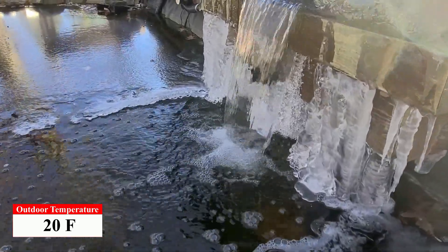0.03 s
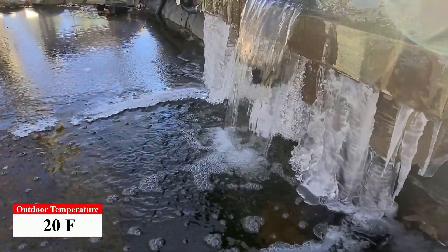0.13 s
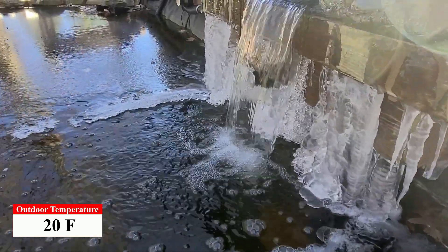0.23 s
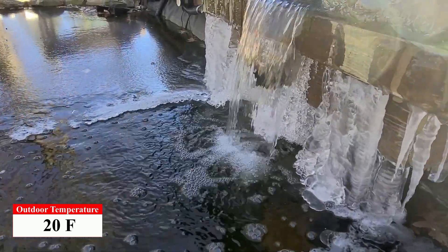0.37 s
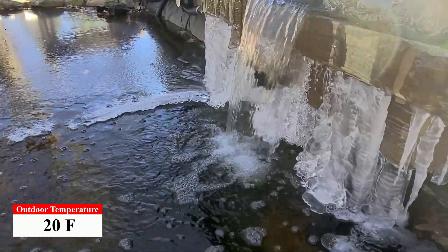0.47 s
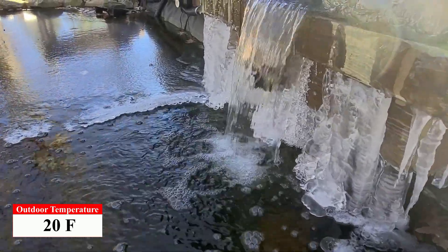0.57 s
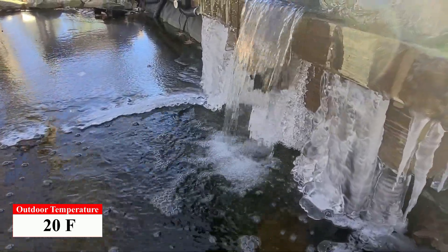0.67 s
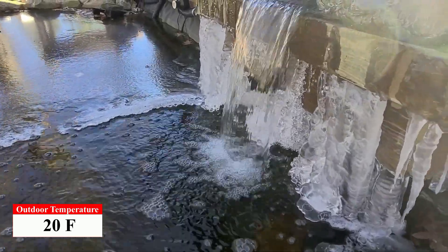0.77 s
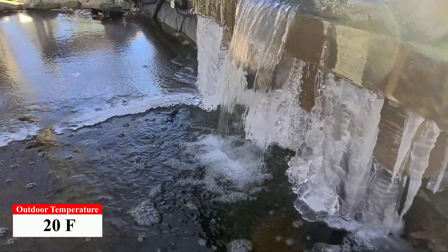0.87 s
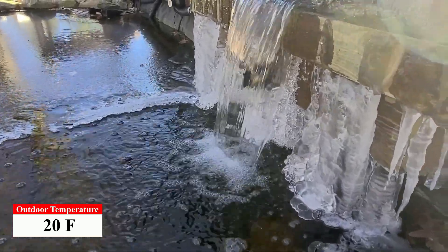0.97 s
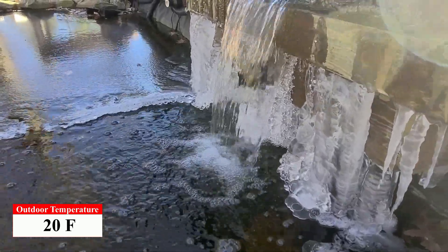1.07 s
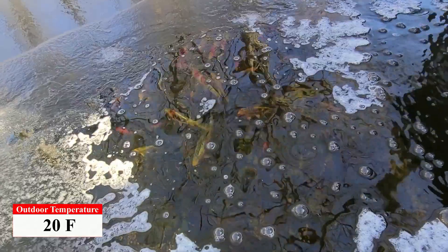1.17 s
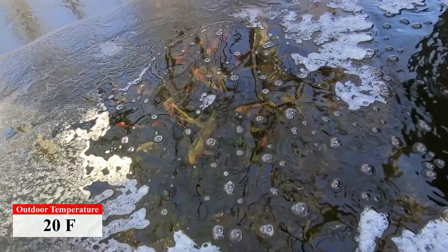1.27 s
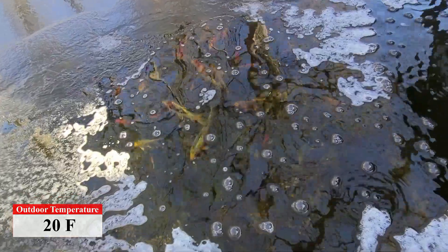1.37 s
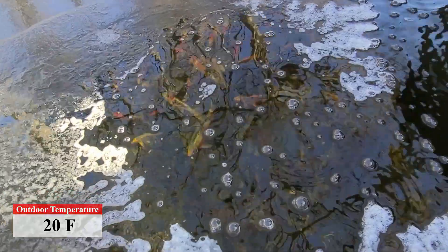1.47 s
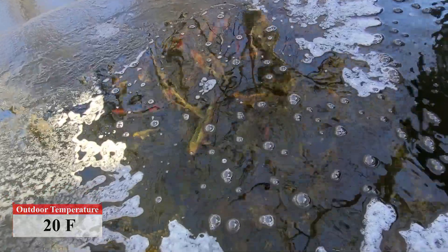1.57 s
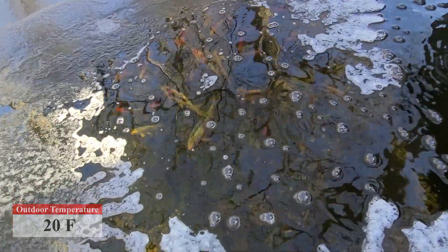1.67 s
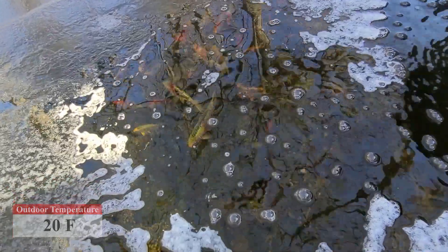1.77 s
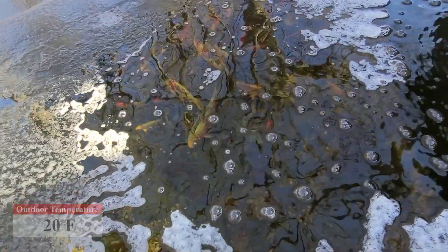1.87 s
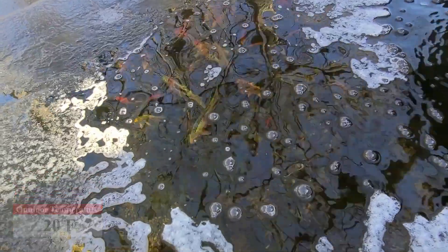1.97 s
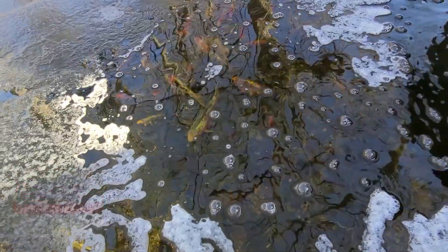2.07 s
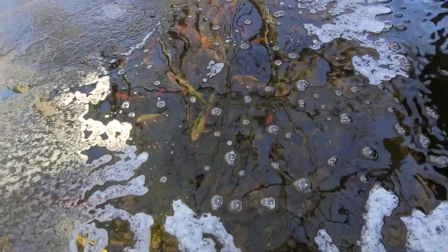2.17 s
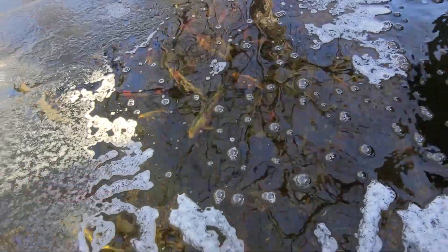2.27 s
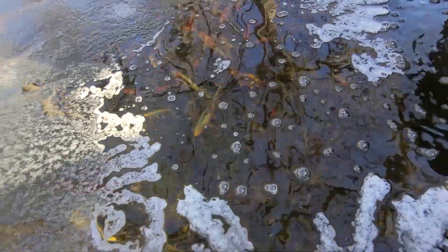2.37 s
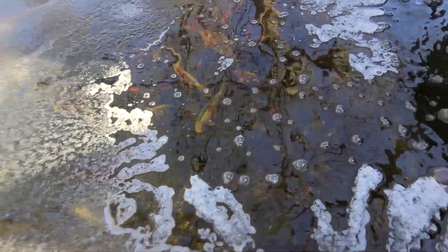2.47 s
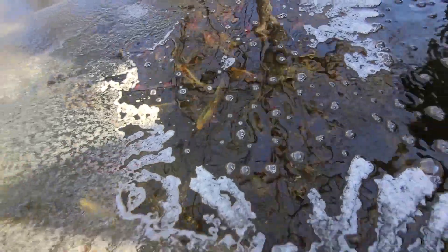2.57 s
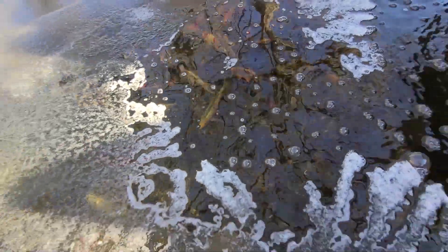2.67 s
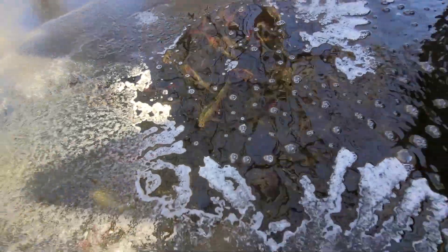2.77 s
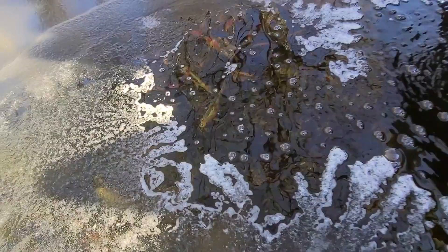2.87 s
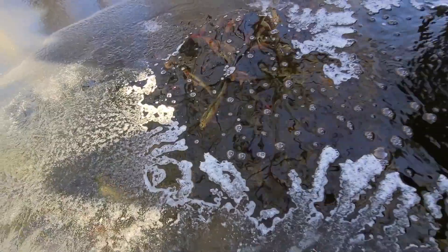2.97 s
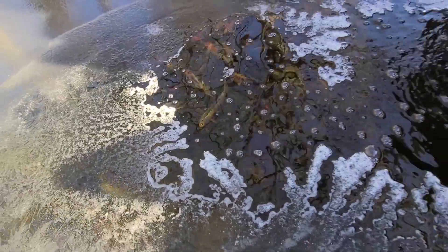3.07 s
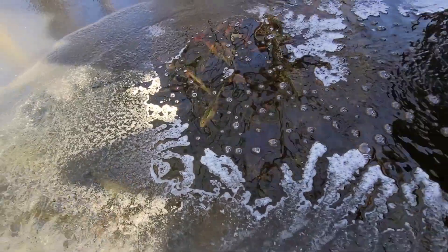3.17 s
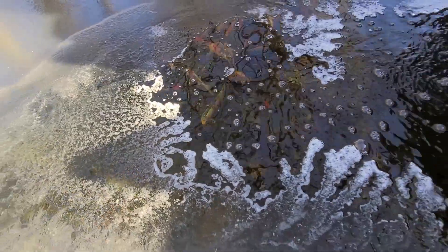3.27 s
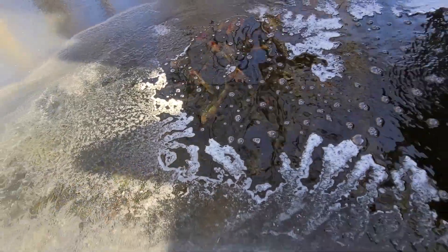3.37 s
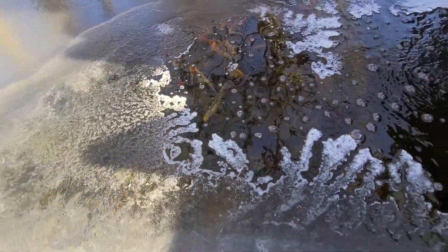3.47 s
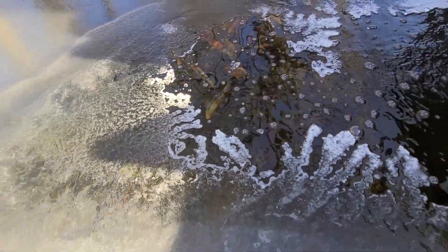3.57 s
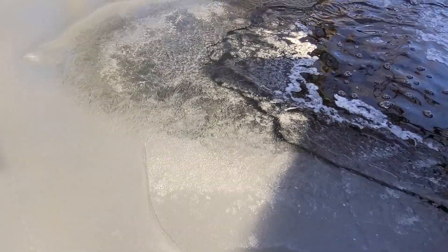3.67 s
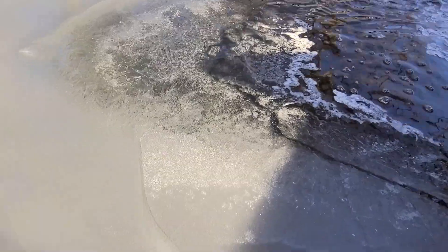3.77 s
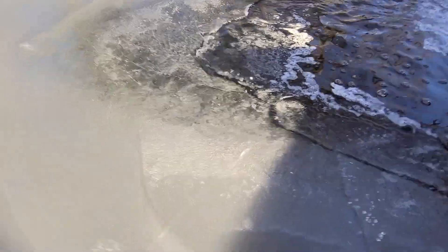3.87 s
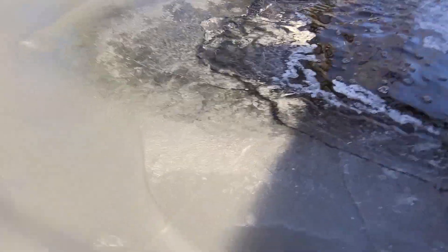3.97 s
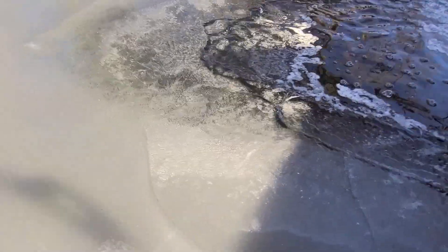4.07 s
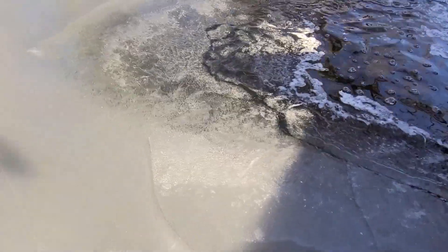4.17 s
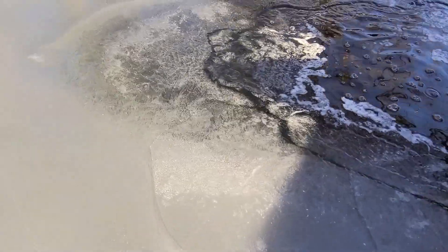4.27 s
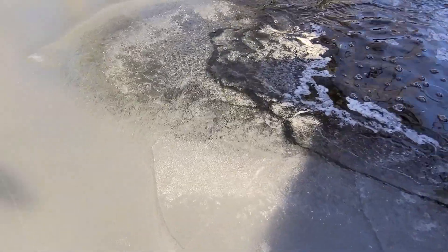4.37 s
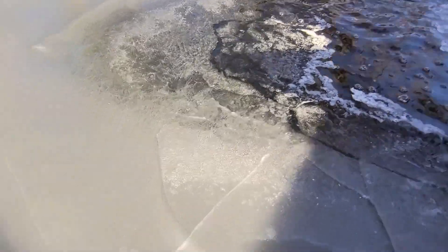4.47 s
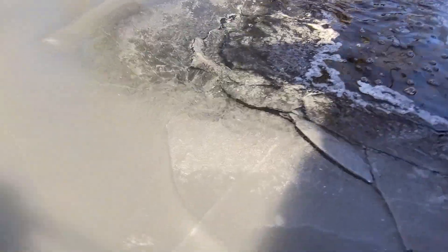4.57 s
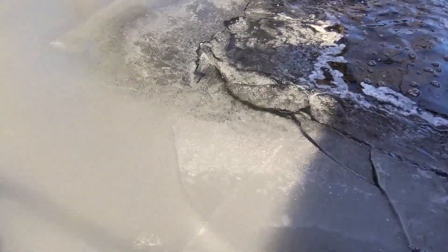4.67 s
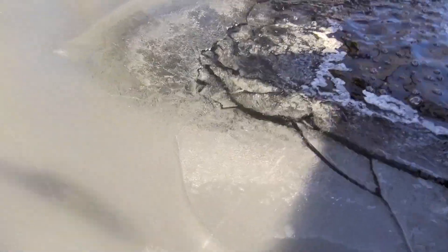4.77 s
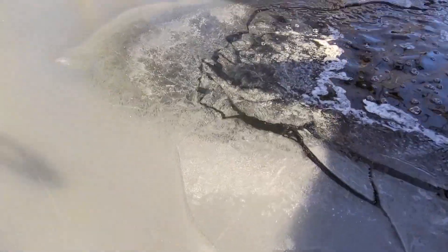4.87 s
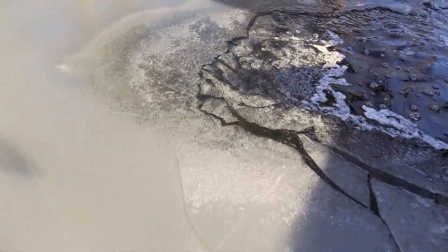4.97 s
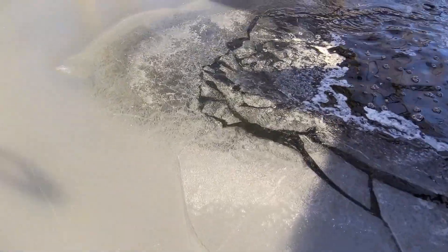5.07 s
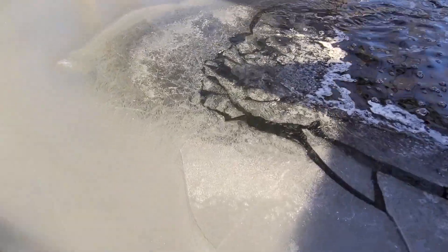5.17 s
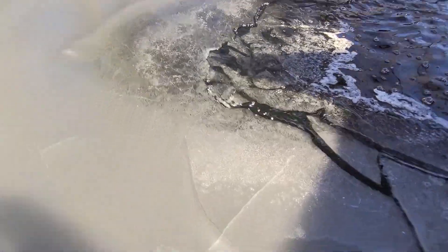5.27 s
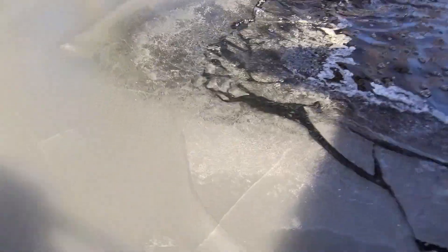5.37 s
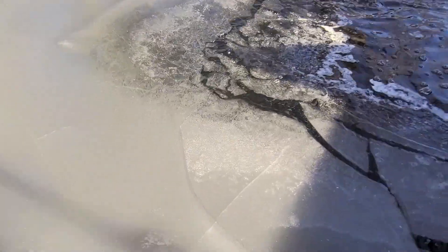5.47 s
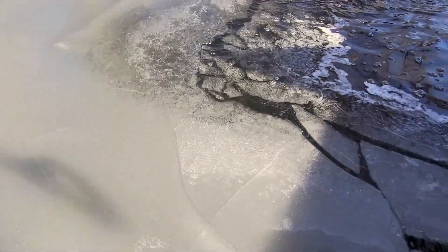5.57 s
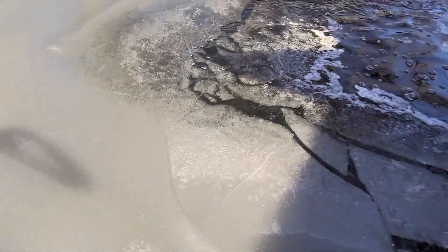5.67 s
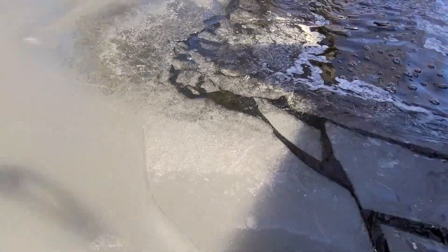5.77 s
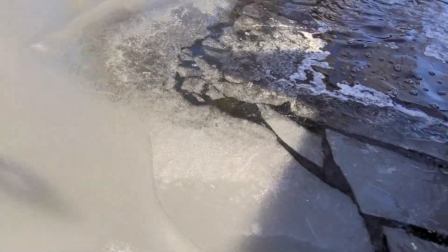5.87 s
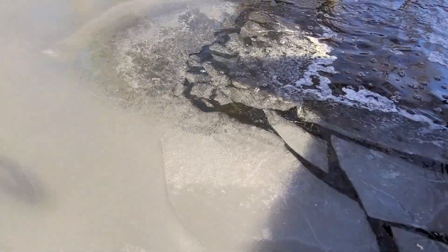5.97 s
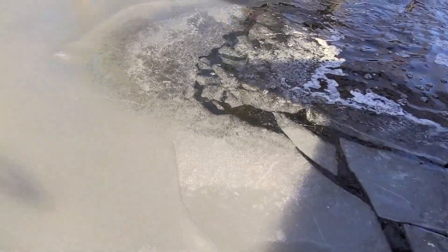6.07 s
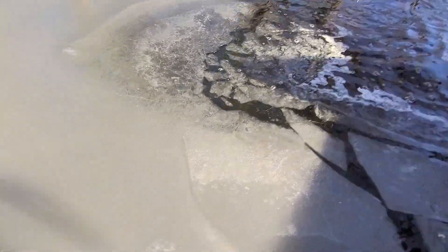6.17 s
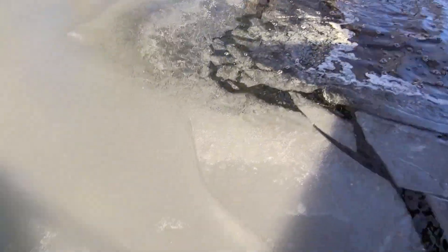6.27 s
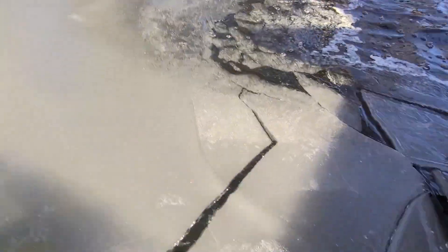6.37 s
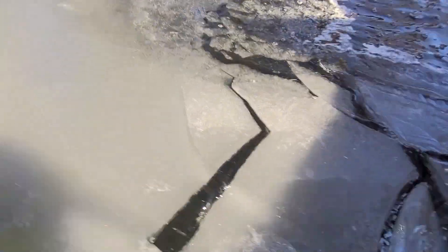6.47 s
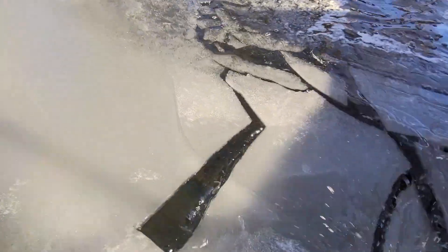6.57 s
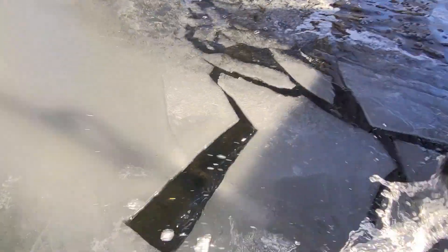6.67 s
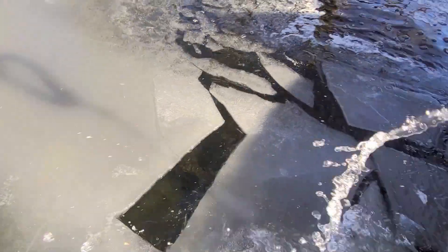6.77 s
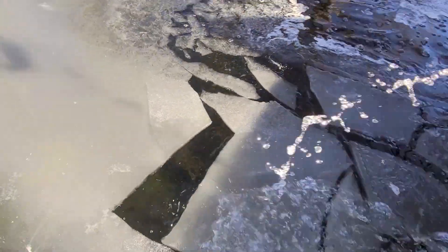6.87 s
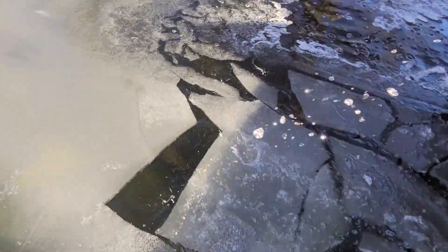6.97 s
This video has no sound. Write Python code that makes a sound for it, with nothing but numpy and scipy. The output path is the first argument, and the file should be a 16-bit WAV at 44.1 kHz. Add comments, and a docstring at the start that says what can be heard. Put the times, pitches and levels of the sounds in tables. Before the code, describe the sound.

Outdoors at a partly frozen garden pond, a small waterfall splashes and bubbles steadily over a low rumble, with near drops plinking. The closer stereo microphone shifts place twice, the water becoming duller and quieter. Then four spaced blows hit the ice sheet: thud, sharp crack, crunch, hollow ringing and deep boom, each with a little spurt of water. The last is the heaviest, with floes knocking, water surging and drops pattering.

```python
"""At a half-frozen garden pond a stereo pair hears a small waterfall, noise and ringing bubbles, over a low rumble.
Near drops plink; the listening place moves at 1.2 s and at 3.6 s, just after a second large bubble gulps up.
From 3.8 s four blows break the ice sheet: noise bursts crack and crunch, modes ring, the sheet heaves and booms.
Spurts of spray and bubbles follow each blow; after the last, water surges, air gulps up and drops patter.
Loud blows push the recorder's gain down, and it creeps back afterwards."""
import sys
import numpy as np
from scipy import signal
from scipy.fft import rfft, irfft, next_fast_len
from scipy.io import wavfile
from scipy.ndimage import uniform_filter1d, map_coordinates

SR = 44100
rng = np.random.default_rng(int(sys.argv[2]) if len(sys.argv) > 2 else 0)


def master_out(mix):
    """Clip the mix to full scale and print it as 16-bit PCM to the path in sys.argv[1]."""
    frames = np.transpose(np.atleast_2d(mix))
    ceiling = np.clip(frames, -1, 1)
    pcm = np.round(ceiling * 32767).astype(np.int16)
    wavfile.write(sys.argv[1], SR, pcm)


N = 309135

# Level of the waterfall, before fixed trims: (time [s], bubbling level [dB], spray level [dB])
WATERFALL_LEVEL = [(0, -36.5, -43.5), (1.2, -35.5, -43), (2.7, -36, -43.5), (3.62, -35.5, -46),
                   (3.66, -44, -52.5), (5.0, -42, -51), (5.65, -42, -50), (5.92, -37.5, -47.5),
                   (7.0, -35, -42.5)]
# Listening places, levels before fixed trims: (start [s], lead of the right microphone [ms],
# spatter level [dB], its unevenness [dB], treble left over right [dB], rumble over bubbling [dB])
LISTENING_PLACES = [(0, 0.0076, -3, 5, 2.5, 1), (1.173, 0.46, -4.5, 5.5, -7, -3),
                    (3.643, 0.4, -7, 5.5, -4, -1)]
# Colour of the water, one relative spectrum for each place: (frequency [Hz], density [dB per Hz])
WATER_SPECTRA = [
    [(100, -30), (200, -14), (400, -4.5), (750, 2), (1050, -0.5), (1300, 2.5), (1900, -3.5), (2500, -7.5),
     (3300, -10), (5000, -15), (8800, -14.5), (12000, -18), (16000, -22)],
    [(100, -30), (200, -8.5), (400, -5.5), (750, 1.5), (1050, -0.5), (1300, 0.5), (1900, -5), (2500, -10.5),
     (3300, -11.5), (4400, -16), (6500, -19), (8800, -16.5), (12000, -22), (16000, -26.5)],
    [(100, -30), (200, -14), (400, -5.5), (800, 2.5), (1350, 2.5), (2100, -8.5), (3300, -12), (6000, -19.5),
     (8800, -17), (12000, -21.5), (16000, -24.5)],
]
# Relative spectrum of the rumble: (frequency [Hz], density [dB per Hz])
RUMBLE_SPECTRUM = [(12, -46.5), (20, -20), (46, -1.5), (65, 1.5), (82, 0), (134, -12.5), (172, -14.5),
                   (242, -22.5), (300, -21), (390, -23), (660, -120)]
# Decay of the garden's reflections: (frequency [Hz], t60 [s])
GARDEN_DECAY = [(200, 0.17), (2000, 0.15), (12000, 0.19)]
# Nearest drops plinking into the pond, before a fixed trim: (time [s], peak level [dB], pitch [Hz])
NEAR_DROPS = [(.551, -24.5, 3200), (.675, -28, 2700), (.691, -25, 3560), (.931, -25.5, 3270),
              (.957, -24, 2600), (1.097, -22, 2630), (1.389, -27.5, 2510), (2.423, -28, 2080)]
# Showers of smaller drops, before the same trim:
# (start [s], end [s], rate [drops per s], mean peak level [dB], middle pitch [Hz])
DROP_SHOWERS = [(0, 1.12, 26, -30.5, 2890), (0.301, 1.12, 9, -29, 1400), (1.199, 3.502, 14, -34, 2507),
                (6.85, 6.98, 70, -28.5, 1710)]
# Sharpest chips and droplets landing on the ice, before a fixed trim: (time [s], peak level [dB], pitch [Hz])
ICE_TICKS = [(.767, -25.5, 9000), (2.67, -30, 8400), (2.847, -30, 5200), (3.115, -33, 10300),
             (5.4012, -25.5, 8200), (6.4945, -17, 9800), (6.55, -13.5, 7700), (6.948, -22, 8800)]
# Large air bubbles: (time [s], level [dB], start pitch [Hz], end pitch [Hz], length [s])
AIR_GULPS = [(2.502, -33.5, 558, 656, 0.06), (3.602, -35.5, 410, 630, 0.028), (5.326, -26, 340, 408, 0.037),
             (6.487, -12, 478, 637, 0.017), (6.493, -15, 736, 1270, 0.015), (6.511, -19.5, 283, 1037, .056),
             (6.829, -24, 1280, 2040, 0.0095), (6.845, -20, 754, 1475, .0136),
             (6.872, -25, 1480, 1780, 0.0114), (6.927, -24, 1960, 2130, 0.014)]
# Blows on the ice: (time [s], first touch level [dB], crack level [dB], crunch level [dB],
# plunge level [dB], rebound level [dB], spurt level [dB], spurt length [s])
ICE_BLOWS = [(3.819, -13, -9.5, -18.5, -8, -18, -33, 0.022),
             (4.4787, -18, -8, -17.5, -10, -25.5, -32.5, 0.032),
             (5.213, -24, -10, -18.5, -9, -20, -22, 0.054),
             (6.3247, -12, -12, -16, -2.5, -13, -20.5, 0.023)]
# The sheet splits further and its floes knock together: (time [s], crack level [dB], ring level [dB])
FLOE_KNOCKS = [(6.338, -20, -17), (6.356, -15, -9.5), (6.433, -12.5, -16.5), (6.494, -12, -20)]
# Modes of the floating sheet, before random scatter: (frequency [Hz], level [dB], t60 [s])
ICE_MODES = [(163, -17, 0.17), (270.4, -7.5, 0.2), (351.2, -6, 0.18), (381.3, -4.5, 0.36), (440, -13, 0.23),
             (587, -8, 0.1), (732, -1.5, 0.064), (857, 1.5, 0.053), (957, -22, 0.11), (1270, -1, 0.02),
             (1870, 3.5, 0.038)]
# Relative spectrum of cracking ice: (frequency [Hz], density [dB per Hz])
CRACK_SPECTRUM = [(100, -17), (400, 3), (850, 2), (1300, -6), (2500, -7), (4000, -3), (6000, -9.5),
                  (11000, -15), (16000, -30)]
# Relative spectrum of crunching ice: (frequency [Hz], density [dB per Hz])
CRUNCH_SPECTRUM = [(40, 5), (130, 10.5), (300, 0.5), (850, 2), (1200, -7.5), (2000, -9), (2700, -17),
                   (4000, -15), (6000, -20.5), (10000, -23.5), (16000, -29)]
# How long the broken edges crumble: (frequency [Hz], t60 [s])
CRUMBLE_DECAY = [(150, 0.41), (400, 0.35), (900, 0.18), (2000, 0.24), (7000, 0.48), (15000, 0.3)]
# Water surging through the broken sheet: (time [s], length [s], spurt level [dB], slosh level [dB])
LATE_SPLASHES = [(6.428, 0.062, -21, -18.5), (6.487, 0.04, -19.5, -18), (6.65, 0.069, -44, -36),
                 (6.824, 0.15, -28, -59)]
# Relative spectrum of spurting water: (frequency [Hz], density [dB per Hz])
SPURT_SPECTRUM = [(150, -20), (500, -21), (1000, -1), (2000, 3), (4000, -4), (6000, -4.5), (10000, -3.5),
                  (16000, -11.5)]
# Relative spectrum of sloshing water: (frequency [Hz], density [dB per Hz])
SLOSH_SPECTRUM = [(60, -23), (180, -7), (300, 4), (600, -2.5), (950, -2), (1500, -9), (4000, -50)]

MONO_HZ = 326  # below about here, scattered sound grows alike at both microphones
DROP_SPREAD_DB, DROP_SPREAD_OCT = 2, 0.42  # how much scattered drops differ in size and pitch
FLIGHT_MIN_S, FLIGHT_MAX_S = 0.041, 0.42  # time aloft of droplets thrown by a splash
DROPLET_DB, DROPLET_HZ = -13.5, 8500  # their mean level over the spurt, before a trim, and middle pitch
TOUCH_S = 0.0087  # the first touch begins this long before the crack
SPURT_S, PLUNGE_S, REBOUND_S, SLOSH_S = 0.027, 0.0347, 0.043, 0.055  # delays after the crack
RING_DB = -5  # ring of a dry blow, over its crack
WET_CRUNCH_DB = -11.5  # crunch of a wet contact, over its crack
WET_RING_DB, WET_RING_HZ = 2, 523  # a water-cushioned contact: rebound ring over crack, upper edge of its modes
MODE_SCATTER_DB = 1.5  # spread of each mode's strength from blow to blow
PUSH_WIDTH_S, BOOM_DB = 0.0041, -6  # width of the plunging push; boom over the plunge
SLOSH_DB, SLOSH_LENGTH_S = -22, 0.06  # slosh over the plunge; length of the water washing back
POCKET_HZ, POCKET_T60_S, POCKET_DB = 356, 0.11, 3  # air under the sheet: pitch, ring time, level over rebound
# gain control: threshold, share of the excess taken off, smoothing time, speed of recovery
AGC_DB, AGC_SHARE, AGC_ATTACK_S, AGC_DB_PER_S = -22.5, 0.44, 0.022, 7.5
TOP_HZ = 16100  # band limit of the recorder


def amp(db):
    """Decibels to gain."""
    return 10 ** (np.asarray(db) / 20)


def unit(x):
    """Scale to rms 1."""
    return x / np.sqrt(np.mean(x ** 2) + 1e-20)


def along(points, hz):
    """Read (frequency [Hz], value) points on a log frequency axis."""
    f, v = np.transpose(points)
    return np.interp(np.log(hz + 1), np.log(f + 1), v)


def curves(rows):
    """One value per sample for each column after the time."""
    s, *cols = np.transpose(rows)
    return [np.interp(np.arange(N) / SR, s, c) for c in cols]


def wobble(rate):
    """A smooth random curve, rate knots a second."""
    knots = rng.standard_normal(int(N * rate / SR) + 4)
    return map_coordinates(knots, [np.arange(N) * rate / SR])


def filtered(x, response):
    """x times a response of frequency."""
    n = x.shape[-1]
    size = next_fast_len(n + SR // 8)
    return irfft(rfft(x, size) * response(np.fft.rfftfreq(size, 1 / SR)), size)[..., :n]


def coloured(x, spectrum):
    """x shaped by the given spectrum, at rms 1."""
    return unit(filtered(x, lambda hz: amp(along(spectrum, hz))))


def dying(x, decay):
    """Each frequency of x dies away at its own speed."""
    hz, t, z = signal.stft(x, SR, nperseg=256)
    fade = amp(-60 * t / along(decay, hz)[:, None])
    return signal.istft(z * fade, SR, nperseg=256)[1][..., :x.shape[-1]]


def patchy(x, depth_db):
    """Small splats: brief random gains, each over a part of the spectrum."""
    z = signal.stft(x, nperseg=256)[2]
    field = uniform_filter1d(rng.standard_normal(z.shape), size=22, axis=0)
    field = uniform_filter1d(field, size=3, axis=1)
    return signal.istft(z * amp(depth_db * unit(field)), nperseg=256)[1][:len(x)]


def from_right(x, lead_ms):
    """A mono sound reaches the right microphone first."""
    side = np.array([[-1], [1]])
    return filtered(x, lambda hz: np.exp(np.pi * 1j * hz * lead_ms / 1000 * side))


def diffuse(x):
    """Scattered sound differs less between the microphones as the waves grow longer."""
    mid, side = (x[0] + x[1]) / 2, (x[0] - x[1]) / 2
    side = filtered(side, lambda hz: hz ** 2 / (hz ** 2 + MONO_HZ ** 2))
    return np.array([mid + side, mid - side])


def add(track, s, sound):
    """Mix a sound into the track at time s."""
    part = track[..., max(0, round(s * SR)):][..., :sound.shape[-1]]
    part += sound[..., :part.shape[-1]]


def bubbles(n, count, low_hz, high_hz, cycles, spread_db, rise):
    """n samples of decaying bubble rings, pitched evenly in octaves; each rises as it nears the surface."""
    when, pitch, size = rng.random((count, 3)).T[..., None]
    hz = low_hz * (high_hz / low_hz) ** pitch
    t = np.arange(SR // 60) / SR
    age = t * hz / cycles
    strength = hz * amp(-spread_db * np.log(np.maximum(size, 0.02)))
    tone = np.sin(2 * np.pi * hz * t * (1 + rise * np.minimum(age, 4)))
    ring = strength * np.exp(-age) * (1 - t / t[-1]) * tone
    position = (when * n).astype(int) + np.arange(len(t))
    return unit(np.bincount(position.ravel(), ring.ravel(), n)[:n])


def spatter(shape, rate, spread_db):
    """Random tiny impacts of very unequal size, rms 1."""
    size = amp(spread_db * np.minimum(rng.exponential(size=shape), 5))
    return unit((rng.random(shape) < rate / SR) * size * rng.standard_normal(shape))


def garden(x):
    """Stones and ice scatter a sound into a short tail of noise, unlike at the two microphones."""
    tail = dying(rng.standard_normal((2, SR // 4)), GARDEN_DECAY)
    return signal.fftconvolve(x, tail / np.linalg.norm(tail[0]), axes=1)[:, :x.shape[1]]


def waterfall():
    """The falling sheet traps bubbles and throws spray, amid a diffuse wash and the garden's reflections."""
    out = np.zeros((2, N))
    bubbling_db, spray_db = curves(WATERFALL_LEVEL)
    swarm = bubbles(N, count=9000, low_hz=393.4, high_hz=4543, cycles=5.7, spread_db=2.5, rise=0.034)
    for place, spectrum in zip(LISTENING_PLACES, WATER_SPECTRA):
        s, lead_ms, spatter_db, uneven_db, treble_db, _ = place
        surge = amp(uneven_db * 0.52 * wobble(200))  # the sheet breaks up in lumps
        spray = patchy(surge * spatter(N, rate=9000, spread_db=3.0), uneven_db)
        spray = filtered(spray, lambda hz: hz / (hz + 1200))
        direct = from_right(amp(-5) * swarm + amp(spatter_db + 3.5) * spray, lead_ms)
        wash = amp(4.5) * diffuse(rng.standard_normal((2, N))) + amp(-0.5) * garden(direct)
        water = coloured(direct + wash, spectrum)
        # the recorder's body shades the treble at the far microphone
        tilt_db = treble_db * np.array([[0.5], [-0.5]])
        water = filtered(water, lambda hz: amp(tilt_db / (1 + (5500 / (hz + 1)) ** 4)))
        low = filtered(water, lambda hz: 1 / (1 + (hz / 2600) ** 4))
        mix = amp(bubbling_db + 3.5) * unit(low) + amp(spray_db + 3) * unit(water - low)
        start = max(0, round(s * SR))
        out[:, start:] = mix[:, start:]  # each place replaces the one before
    return out


def rumble():
    """Deep noise and a wavering hum follow the waterfall's level, nearly the same at both microphones."""
    starts, *_, over_db = np.transpose(LISTENING_PLACES)
    place = np.searchsorted(starts[1:], np.arange(N) / SR)
    level_db = curves(WATERFALL_LEVEL)[0] + over_db[place] + 2.4 * wobble(5.24)
    noise = rng.standard_normal(N) + 0.17 * rng.standard_normal((2, N))
    noise = coloured(noise, RUMBLE_SPECTRUM)
    hum_level = amp(-8.0 + 6.0 * wobble(4.9))
    hum = hum_level * np.sin(2 * np.pi * np.cumsum(76 + 4 * wobble(7)) / SR)
    return amp(level_db + 4) * (noise + hum) * amp([[-0.6], [0.6]])


def scattered(start, end, db, hz, count):
    """Drops at random times, sizes and pitches: (time [s], peak level [dB], pitch [Hz])."""
    when, (size, pitch) = rng.random(count), rng.standard_normal((count, 2)).T
    times = start + (end - start) * when
    return list(zip(times, db + DROP_SPREAD_DB * size, hz * 2 ** (DROP_SPREAD_OCT * pitch)))


def drips(rows, t60, click_db, rise):
    """Each drop lands with a ragged splat, and a brief tone of rising pitch rings after it."""
    out, t = np.zeros((2, N)), np.arange(SR // 16) / SR
    for s, db, hz in rows:
        tone = np.sin(2 * np.pi * hz * t * (1 + rise * t / t60))
        ring = amp(-60 * t / t60) * (1 - np.exp(-t * hz / 2)) * tone
        spectrum = [(hz / 4, -18), (hz / 2, -7), (hz, 0), (hz * 2, -10), (hz * 4, -20)]
        splat = coloured(rng.standard_normal((2, len(t))), spectrum)
        add(out, s, amp(db) * (ring + amp(click_db - 120 * t / t60) * splat))
    return out


def drops():
    """Drops ring in open water; droplets thrown by the splashes tick higher and shorter on the ice."""
    plinks, ticks = list(NEAR_DROPS), list(ICE_TICKS)
    for start, end, rate, db, hz in DROP_SHOWERS:
        plinks += scattered(start, end, db, hz, count=round(rate * (end - start)))
    for s, _, spurt_db, _ in surges():
        ticks += scattered(s + FLIGHT_MIN_S, s + FLIGHT_MAX_S, spurt_db + DROPLET_DB, DROPLET_HZ, count=4)
    in_water = drips(plinks, t60=0.042, click_db=1.0, rise=0.083)
    on_ice = drips(ticks, t60=0.023, click_db=6.0, rise=0.01)
    return amp(-2.5) * in_water + amp(-5) * on_ice


def gulps():
    """Large air pockets close and glide up in pitch."""
    out = np.zeros(N)
    for s, db, start_hz, end_hz, length in AIR_GULPS:
        u = np.arange(int(length * SR)) / (length * SR)
        phase = 2 * np.pi * np.cumsum(start_hz * (end_hz / start_hz) ** u) / SR
        add(out, s, amp(db) * np.sqrt(np.sin(np.pi * u)) * np.sin(phase))
    return from_right(out, lead_ms=0.2)


def ringing(t, soft_hz):
    """Modes of the floating sheet, at new strengths for every contact; those above soft_hz are barely struck."""
    out = np.zeros((2, len(t)))
    for hz, db, t60 in ICE_MODES:
        size, detune, skew = rng.standard_normal(3)
        drift = rng.standard_normal(len(t)) + 0.5 * rng.standard_normal(out.shape)
        slop = 0.028 * np.cumsum(drift, axis=1)  # washing water blurs the pitch
        lead = np.array([[-1], [1]]) * hz / 750 * (1 + 1.14 * skew)  # the right microphone mostly leads
        swell = 1 - np.exp(-t * hz / 0.5)  # slow modes take longer to build up
        rock = amp(2.9 * map_coordinates(rng.standard_normal(40), [t * 70]))  # the rocking sheet rings unevenly
        level = amp(db + MODE_SCATTER_DB * size - 60 * t / t60) / (1 + (hz / soft_hz) ** 4)
        tone = np.sin(2 * np.pi * hz * (1 + 0.011 * detune) * t + slop + lead)
        out += level * rock * swell * tone
    return out


def contact(crunch_db, ring_db, soft_hz, right_db):
    """One second with a crack in the middle: the ice grinds, snaps, rings its modes and crumbles at the edges."""
    t = np.arange(SR // 2) / SR
    shape, release = (2, len(t)), t / 0.00033
    snap = (release - 1) * np.exp(-release)  # the fracture releases its stress at once
    snap = from_right(np.roll(snap, 20), lead_ms=0.2)
    burst = coloured(rng.standard_normal(shape), CRACK_SPECTRUM) * amp(-60 * t / 0.013)
    crack = amp(5.5) * snap + burst
    chips = diffuse(spatter(shape, rate=4000, spread_db=1.5))
    crunch = amp(crunch_db) * coloured(chips, CRUNCH_SPECTRUM)
    grind = crunch * amp(-4 - 60 * t[::-1] / 0.068)  # swells up to the crack
    after = crack + dying(crunch, CRUMBLE_DECAY) + amp(ring_db) * ringing(t, soft_hz)
    return np.hstack([grind, after]) * amp([[-right_db / 2], [right_db / 2]])


def ice():
    """Each blow touches with a thud and cracks the sheet; its rebound and the loose floes knock more softly."""
    out, press = np.zeros((2, N)), np.arange(SR // 50) / SR / 0.00095 - 3
    thud = (press ** 2 - 1) * np.exp(-press ** 2 / 2)
    wet = list(FLOE_KNOCKS)
    for s, touch_db, crack_db, crunch_db, _, rebound_db, *_ in ICE_BLOWS:
        add(out, s - TOUCH_S, amp(touch_db) * thud)
        dry_blow = contact(crunch_db - crack_db, ring_db=RING_DB, soft_hz=1690, right_db=0.0)
        add(out, s - 0.5, amp(crack_db) * dry_blow)  # the crack lies 0.5 s into a contact
        wet.append((s + REBOUND_S, rebound_db, rebound_db + WET_RING_DB))
    for s, crack_db, ring_db in wet:
        knock = contact(WET_CRUNCH_DB, ring_db - crack_db, soft_hz=WET_RING_HZ, right_db=5.0)
        add(out, s - 0.5, amp(crack_db) * knock)
    return out


def surges():
    """All splashes, blows' spurts and backwash too: (time [s], length [s], spurt level [dB], slosh level [dB])."""
    rows = list(LATE_SPLASHES)
    for s, *_, plunge_db, _, spurt_db, length in ICE_BLOWS:
        rows.append((s + SPURT_S, length, spurt_db, plunge_db + SLOSH_DB))
        rows.append((s + SLOSH_S, SLOSH_LENGTH_S, plunge_db - 39, plunge_db + SLOSH_DB))
    return rows


def splashes():
    """Water sloshes up between the floes and bursts into spray and rising bubbles."""
    out, t = np.zeros((2, N)), np.arange(SR // 3) / SR
    for s, length, spurt_db, slosh_db in surges():
        froth = bubbles(len(t), count=110, low_hz=816, high_hz=4310, cycles=8.7, spread_db=3.5, rise=0.065)
        jet = unit(patchy(spatter(len(t), rate=4300, spread_db=2), depth_db=8))
        spray = from_right(jet + 0.5 * froth, lead_ms=0.264)
        spray = spray + 1.05 * spatter((2, len(t)), rate=5000, spread_db=5)
        slosh = from_right(rng.standard_normal(len(t)), lead_ms=0.43)
        slosh = slosh + 0.5 * rng.standard_normal((2, len(t)))
        swell = (1 - np.exp(-t / (0.077 * length))) / (1 + (t / length) ** 8)
        spurt = amp(spurt_db) * coloured(spray, SPURT_SPECTRUM)
        add(out, s, swell * (spurt + amp(slosh_db) * coloured(slosh, SLOSH_SPECTRUM)))
    return out


def heaves(boom_hz, t60):
    """After each blow the plunging sheet gives one deep push, then booms on the water."""
    out, t = np.zeros((2, N)), np.arange(SR // 2) / SR
    u = t / PUSH_WIDTH_S - 4  # the push peaks four widths in
    push = (u ** 2 - 1) * np.exp(-u ** 2 / 2) * amp([[-5], [2]])
    boom = amp(BOOM_DB - 60 * t / t60) * np.sin(2 * np.pi * boom_hz * t) * amp([[-2], [2]])
    for s, _, _, _, plunge_db, *_ in ICE_BLOWS:
        add(out, s + PLUNGE_S - 4 * PUSH_WIDTH_S, amp(plunge_db) * push)
        add(out, s + PLUNGE_S, amp(plunge_db) * boom)
    return out


def pockets():
    """As the sheet rebounds, the air trapped under it rings with a hollow, wavering note."""
    out, t = np.zeros((2, N)), np.arange(SR // 2) / SR
    for s, *_, rebound_db, _, _ in ICE_BLOWS:
        hz = POCKET_HZ * (1 + 0.11 * wobble(160)[:len(t)])
        level_db = rebound_db + POCKET_DB + 2.5 * wobble(114)[:len(t)] - 60 * t / POCKET_T60_S
        level = amp(level_db) * (1 - np.exp(-t * POCKET_HZ))
        note = from_right(level * np.sin(2 * np.pi * np.cumsum(hz) / SR), lead_ms=0.22)
        add(out, s + REBOUND_S, note * amp([[-1.5], [1.5]]))
    return out


def gain_control(x):
    """Loud blows push the gain down; it creeps back at a steady rate."""
    window = SR // 100
    power = signal.lfilter(np.ones(window) / window, 1, np.mean(x ** 2, axis=0))
    level_db = 10 * np.log10(np.abs(power) + 1e-12)
    excess_db = AGC_SHARE * np.maximum(level_db - AGC_DB, 0)
    recovery_db = AGC_DB_PER_S * np.arange(N) / SR
    # holds each peak of the excess and lets it fall at the recovery speed
    cut_db = np.maximum.accumulate(excess_db + recovery_db) - recovery_db
    keep = np.exp(-1 / (AGC_ATTACK_S * SR))
    return x * amp(-signal.lfilter([1 - keep], [1, -keep], cut_db))


def scene():
    """All sources around the pond; the open garden returns little bass."""
    near = drops() + gulps() + ice() + splashes() + heaves(boom_hz=80.5, t60=0.42) + pockets()
    echo = filtered(garden(near), lambda hz: hz / (hz + 200))
    return waterfall() + rumble() + near + amp(-6.5) * echo


def record(dry):
    """The recorder thins the deepest bass, rides its gain, rounds off peaks and stops at its band limit."""
    thinned = filtered(dry, lambda hz: 1j * hz / (1j * hz + 16))
    levelled = gain_control(thinned)
    rounded = levelled / (1 + np.abs(levelled / 0.95) ** 6) ** (1 / 6)
    return filtered(rounded, lambda hz: hz < TOP_HZ)


dry = scene()
out = record(dry)
master_out(out)
```